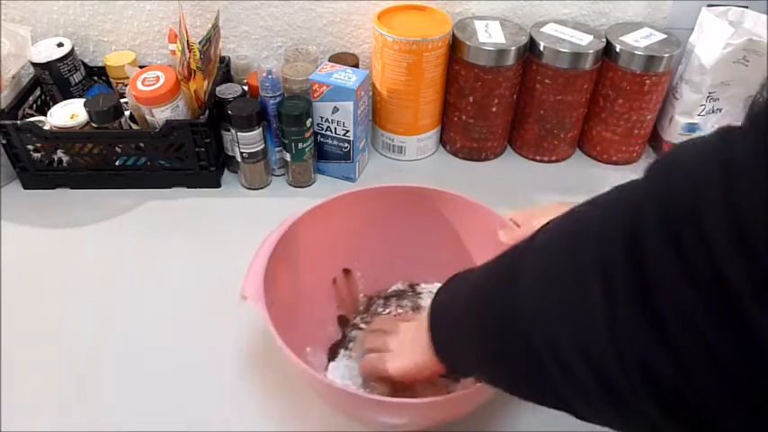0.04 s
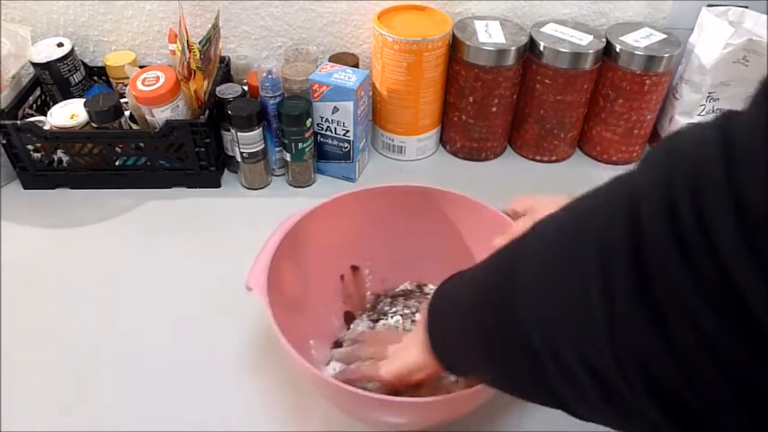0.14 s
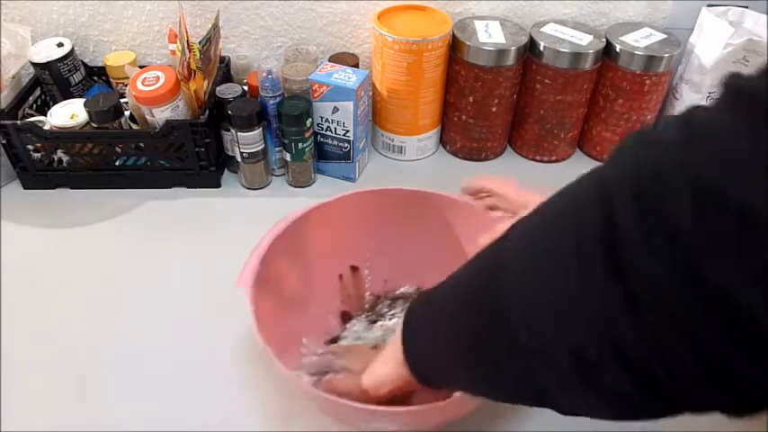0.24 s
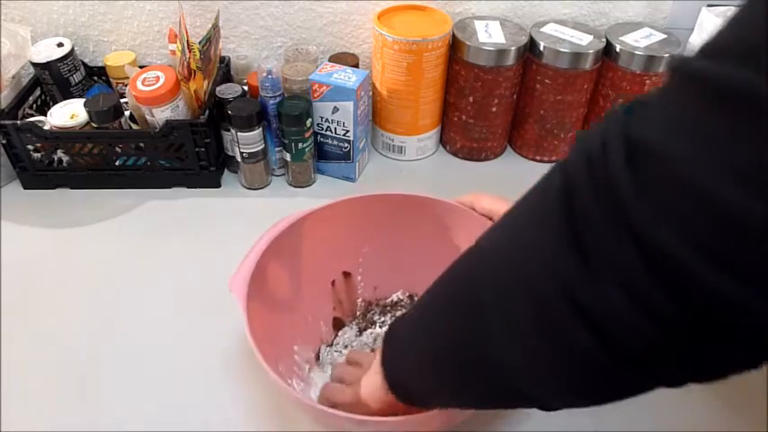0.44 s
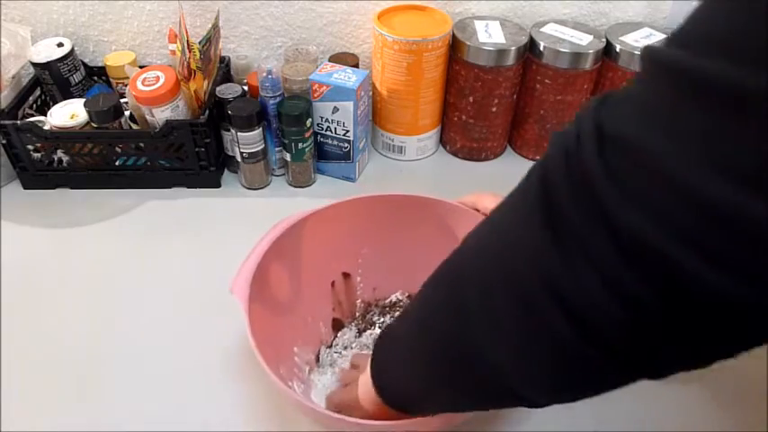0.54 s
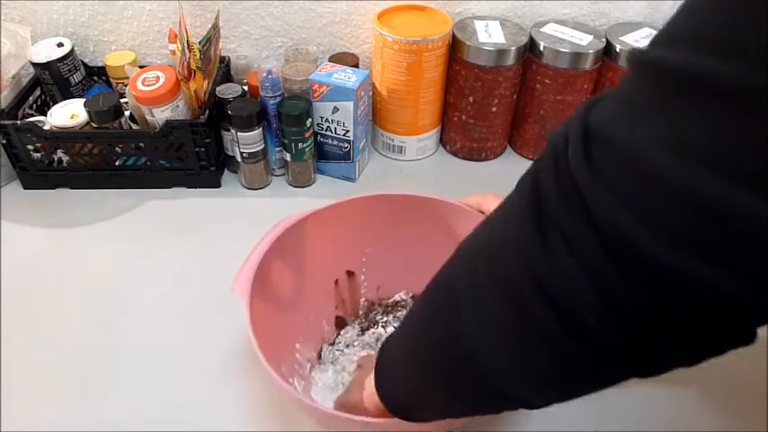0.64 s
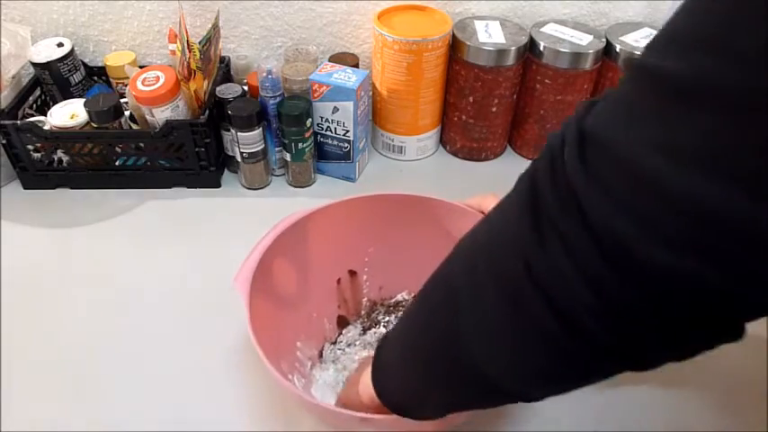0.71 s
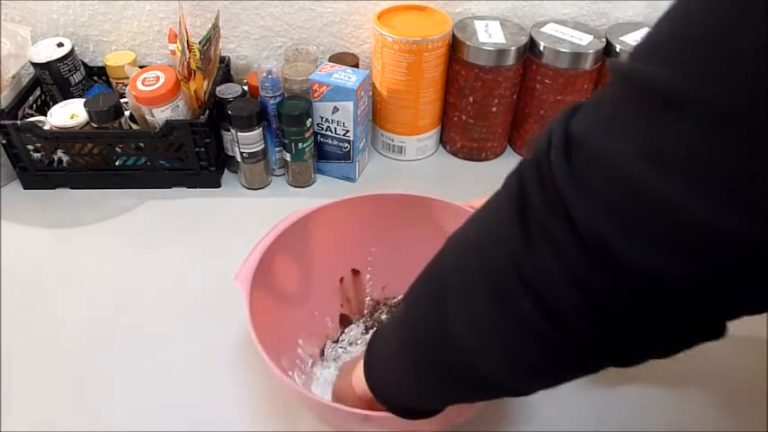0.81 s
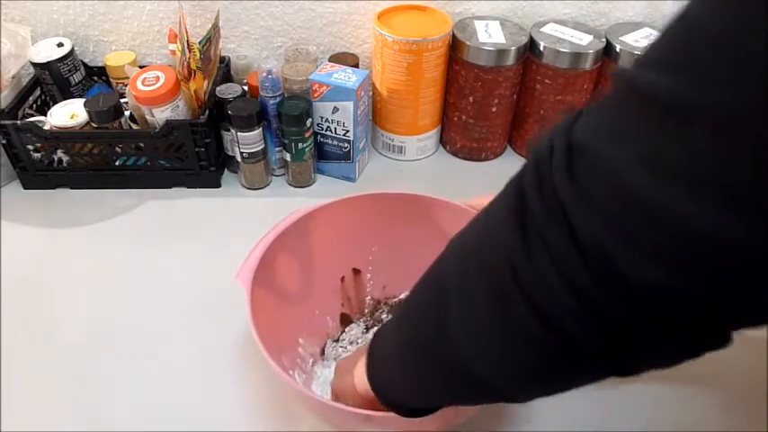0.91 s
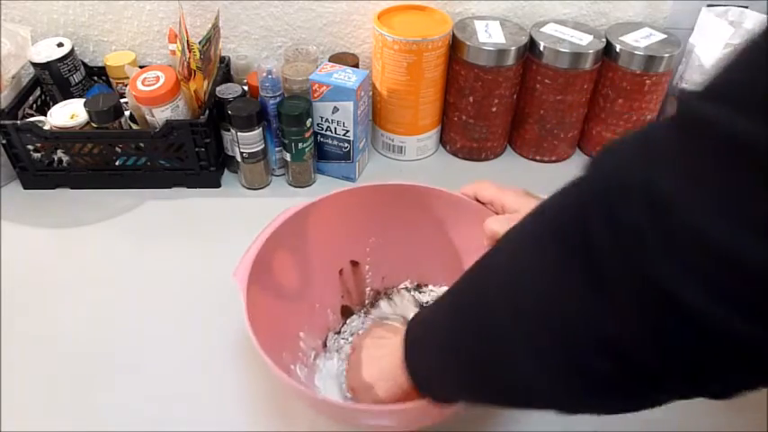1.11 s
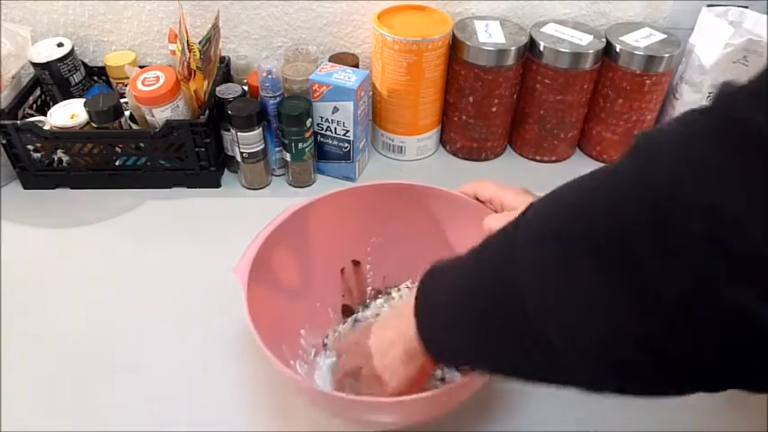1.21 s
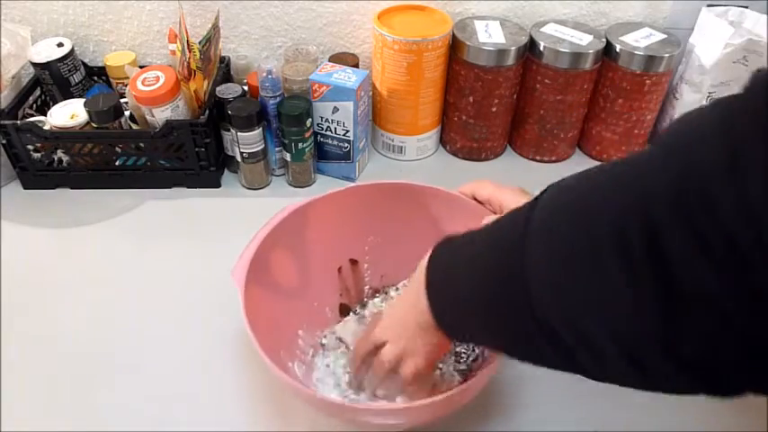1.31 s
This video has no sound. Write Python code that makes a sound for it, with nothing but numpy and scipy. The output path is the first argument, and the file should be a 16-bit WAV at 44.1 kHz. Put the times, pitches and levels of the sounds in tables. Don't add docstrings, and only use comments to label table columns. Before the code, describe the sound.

Close and dull-topped, in a kitchen with a short echo: dry scraping rubs of dough against a plastic bowl, a cluster of knocks on the counter, softer rubbing, then light touches and a faint low groan.

```python
import sys
import numpy as np
from scipy import signal
from scipy.io import wavfile

SR = 44100
rng = np.random.default_rng(int(sys.argv[2]) if len(sys.argv) > 2 else 0)


def int16_out(signal):
    q = np.round(np.clip(np.atleast_2d(signal).T, -1, 1) * 32767)
    wavfile.write(sys.argv[1], SR, q.astype(np.int16))


def attenuation_scalar(level_db):
    decades = np.asarray(level_db, float) / 20
    return 10 ** decades


N = 59535

# (frequency [Hz], density [dB per Hz])
ROOM_TONE = [(35, -63), (60, -23.5), (238, -7), (349, 3), (463, 2), (2750, -6), (5590, -17.5), (6840, -30),
             (7570, -44.5), (9840, -83.5), (16700, -120)]
ROOM_TONE_DB, ROOM_FLICKER_DB = -49.5, 0.43

# (time [s], level [dB])
EFFORT = [(0, -53), (.145, -50), (.172, -38), (.206, -46), (.262, -32.5), (.37, -37), (.4, -41.5),
          (.52, -40), (.6, -44), (.645, -40.5), (.72, -44), (.8, -53.5), (.895, -52), (.945, -44.5),
          (.995, -51), (1.1, -52.5), (1.15, -49), (1.35, -71)]
# (frequency [Hz], density [dB per Hz])
GRAIN = [(150, -17.5), (400, -7.5), (850, -6.5), (1750, 0.5), (2900, -1), (4200, -2.5), (5800, -26),
         (7400, -20)]
# (frequency [Hz], width [Hz], level [dB])
WALL = [(550, 30, 14.5), (657, 99, 15), (1158, 32, 17.5), (1250, 60, -17), (1720, 42, -1), (1830, 220, 27),
        (2430, 100, -3.5), (2520, 220, 5), (3290, 67, -16)]
GRAINS_PER_S, GRAIN_SPREAD_DB, GRAIN_FLICKER_DB = 3500, 1, -0.05
RUB_DB, WALL_DB = -2.5, -7

TOUCH_S = [0.006, 0.09, 0.2195, 0.2425, 0.2519, 0.2577, 0.2596, 0.2642, 0.2755, 0.309, 0.3365, 0.371,
           0.9245, 0.9365, 0.956, 0.964]
# (rim level [dB], body level [dB])
TOUCH_DB = [(-50, -44), (-42, -56), (-37, -48), (-32, -35), (-40, -33), (-16, -24), (-16, -22), (-26, -45),
            (-28, -42), (-29, -50), (-30, -39), (-32, -42), (-38, -60), (-40, -60), (-38, -60), (-38, -60)]
# (frequency [Hz], level [dB], T60 [s])
RIM = [(1156, -20, 0.03), (1492, -17, 0.056), (1737, -12, 0.06), (1941, -15.5, 0.074), (2326, -8.5, 0.034),
       (2558, -8.5, .06), (3500, -6, 0.038)]
BODY_HZ = [488, 521, 557, 606, 752]
BODY_SIDE = [1, -1, -1, -1, -1]
# (level [dB], T60 [s])
BODY = [(-8, .27), (0.2, .075), (-7, .25), (-11, .26), (-19, .25)]
RIM_CONTACT_HZ, BODY_CONTACT_HZ = [700, 2000], 1300
CRACK_DB, CRACK_DECAY_S = -11, 0.001

# (frequency [Hz], level [dB], T60 [s])
COUNTER = [(97, -45.5, 0.33), (199.4, -54.5, 0.11), (289, -44.5, 0.041), (375, -25.5, 0.022)]
COUNTER_BLOW_S = 0.2612

# (time [s], level [dB])
GROAN = [(0, -57), (.1, -64), (.46, -62), (.5, -53), (.53, -58), (.575, -48), (.62, -62), (.8, -62),
         (1.1, -62), (1.14, -54), (1.19, -66), (1.222, -49), (1.255, -58), (1.3, -53), (1.35, -58)]
GROAN_HZ, GROAN_WIDTH_HZ = 365, 55
GROAN_DB, GROAN_OCTAVE_DB = -1, -8.5

KITCHEN_T60_S, KITCHEN_DB, WALL_CUT_HZ = 0.21, -12.5, 2400
BODY_ECHO_SHARE = 0.25
LOW_CUT_HZ, TOP_CUT_HZ, HISS_DB = 122, 8820, -95.5


def rms_one(x):
    return x / np.sqrt(np.mean(x ** 2) + 1e-20)


def in_time(rows):
    s, value = np.transpose(rows)
    return np.interp(np.arange(N) / SR, s, value)


def drift(rate_hz):
    r = np.exp(-80 * np.pi * rate_hz / SR)
    white = rng.standard_normal(N // 40 + 2002)
    slow = signal.lfilter([1], [1, -2 * r, r * r], white)[2000:]
    return np.interp(np.arange(N) / 40, np.arange(len(slow)), rms_one(slow))


def butter(x, order, hz, kind):
    return signal.sosfilt(signal.butter(order, hz, kind, fs=SR, output="sos"), x)


def ring(clicks, hz, t60_s):
    r, w = attenuation_scalar(-60 / (t60_s * SR)), 2 * np.pi * hz / SR
    return signal.lfilter([0, np.sin(w)], [1, -2 * r * np.cos(w), r * r], clicks + 1e-18)


def resonate(x, hz, width_hz):
    r, w = np.exp(-np.pi * width_hz / SR), 2 * np.pi * hz / SR
    gain = (1 - r * r) / 2
    return signal.lfilter(np.array([1, 0, -1]) * gain, [1, -2 * r * np.cos(w), r * r], x)


def coloured(white, spectrum, flicker_db):
    out, together = 0, drift(8)
    edges_hz = 60 * 2 ** np.arange(0, 7.6, .5)
    hz, db = np.transpose(spectrum)
    for k, (low, high) in enumerate(zip(edges_hz, edges_hz[1:])):
        band = butter(white[k % 2], 2, [low, high], "band")
        level_db = np.interp(np.log(low * high) / 2, np.log(hz), db)
        flicker = 0.32 * together + drift(19)
        out = out + attenuation_scalar(level_db + flicker_db * flicker) * band
    return rms_one(out)


def room_tone():
    white = rng.standard_normal((2, N))
    return attenuation_scalar(ROOM_TONE_DB) * coloured(white, ROOM_TONE, ROOM_FLICKER_DB)


def rubbing():
    size_db = GRAIN_SPREAD_DB * np.minimum(rng.exponential(1, (2, N)), 5)
    sizes = attenuation_scalar(size_db) * rng.choice([-1, 1], (2, N))
    grains = sizes * (rng.random((2, N)) < GRAINS_PER_S / SR)
    wall = np.zeros(N)
    for k, (hz, width_hz, db) in enumerate(WALL):
        mode = resonate(grains[k % 2], hz, width_hz) / np.sqrt(width_hz)
        wall += (-1) ** k * attenuation_scalar(db) * mode
    direct = attenuation_scalar(RUB_DB) * coloured(grains, GRAIN, GRAIN_FLICKER_DB)
    return attenuation_scalar(in_time(EFFORT)) * (direct + attenuation_scalar(WALL_DB) * rms_one(wall))


def knocks():
    t = np.arange(N) / SR
    rim_click, body_click, crack = np.zeros(N), np.zeros(N), np.zeros(N)
    for s, (rim_db, body_db) in zip(TOUCH_S, TOUCH_DB):
        rim_click[int(s * SR)] = attenuation_scalar(rim_db)
        body_click[int(s * SR)] = attenuation_scalar(body_db)
        crack += attenuation_scalar(rim_db + CRACK_DB) * (t >= s) * np.exp(-np.abs(t - s) / CRACK_DECAY_S)
    rim_click = butter(rim_click + 1e-18, 2, RIM_CONTACT_HZ, "band")
    body_click = butter(body_click + 1e-18, 2, BODY_CONTACT_HZ, "low")
    rim = crack * rms_one(butter(rng.standard_normal(N), 2, [1500, 5000], "band"))
    for hz, db, t60_s in RIM:
        rim += attenuation_scalar(db) * ring(rim_click, hz, t60_s)
    body = np.zeros(N)
    for hz, side, (db, t60_s) in zip(BODY_HZ, BODY_SIDE, BODY):
        width_hz = 3 * np.log(10) / np.pi / t60_s
        unit_height = SR * t60_s / np.log(10) / 6
        body += side * attenuation_scalar(db) * unit_height * resonate(body_click + 1e-18, hz, width_hz)
    return body, rim


def counter():
    click = np.zeros(N)
    click[int(COUNTER_BLOW_S * SR)] = 1
    click = butter(click + 1e-18, 4, 85, "high")
    return sum(attenuation_scalar(db) * ring(click, hz, t60_s) for hz, db, t60_s in COUNTER)


def groan():
    white = rng.standard_normal((2, N))
    low = resonate(white[0], GROAN_HZ, GROAN_WIDTH_HZ)
    low = rms_one(resonate(low, GROAN_HZ, GROAN_WIDTH_HZ))
    high = rms_one(resonate(white[1], 2.05 * GROAN_HZ, GROAN_WIDTH_HZ))
    return attenuation_scalar(in_time(GROAN) + GROAN_DB) * (low + attenuation_scalar(GROAN_OCTAVE_DB) * high)


def kitchen(x):
    out, dull = np.zeros(N), np.exp(-2 * np.pi * WALL_CUT_HZ / SR)
    lags = (rng.uniform(.009, .035, size=10) * SR).astype(int)
    for k, lag in enumerate(lags):
        loop, state = x.copy(), [0.]
        gain = attenuation_scalar(-60 * lag / SR / KITCHEN_T60_S)
        for i in range(lag, N, lag):
            back, state = signal.lfilter([gain * (1 - dull)], [1, -dull], loop[i - lag:i], zi=state)
            loop[i:i + lag] += back[:N - i]
        out += (loop - x) * (-1) ** k
    return out


def scene():
    body, rim = knocks()
    bowl = rubbing() + rim + counter() + groan()
    echo = attenuation_scalar(KITCHEN_DB) * kitchen(bowl + BODY_ECHO_SHARE * body)
    return np.tile(bowl + body + echo + room_tone(), (2, 1))


def band_limit(x):
    return signal.sosfilt(signal.butter(12, 7720, fs=SR, output="sos"), x)


def record(dry):
    x = butter(dry, 4, LOW_CUT_HZ, "high")
    x = signal.sosfilt(signal.cheby2(12, 80, TOP_CUT_HZ, fs=SR, output="sos"), x)
    hiss = rng.standard_normal(N) + 0.23 * rng.standard_normal((2, N))
    return band_limit(x + attenuation_scalar(HISS_DB) * hiss)


dry = scene()
out = record(dry)
int16_out(out)
```